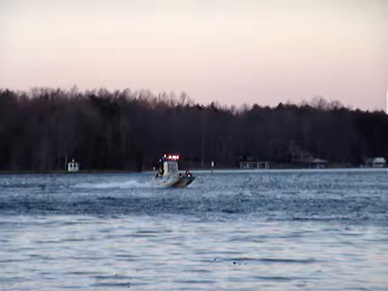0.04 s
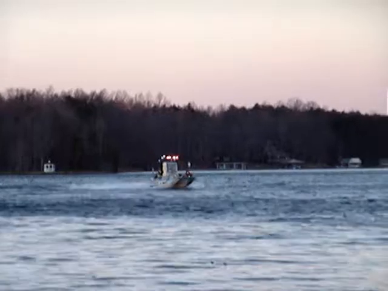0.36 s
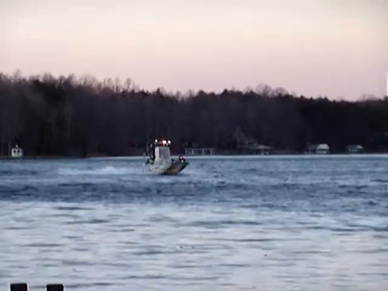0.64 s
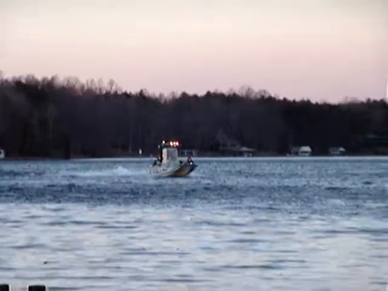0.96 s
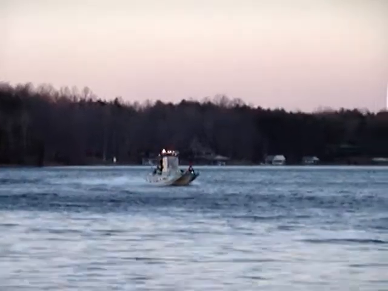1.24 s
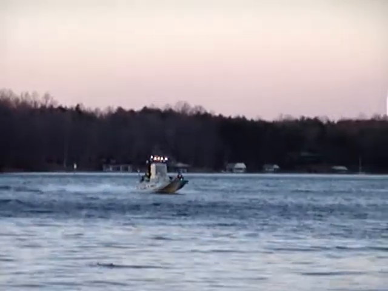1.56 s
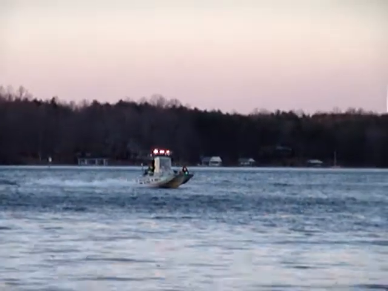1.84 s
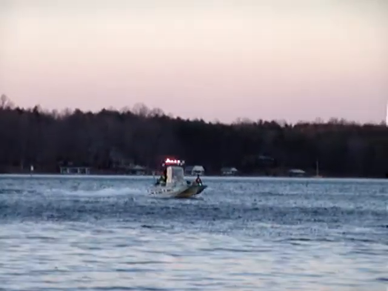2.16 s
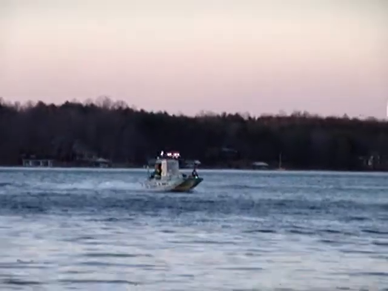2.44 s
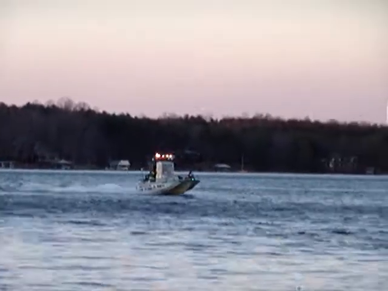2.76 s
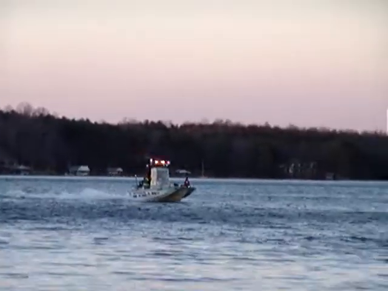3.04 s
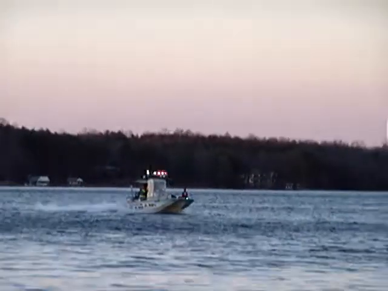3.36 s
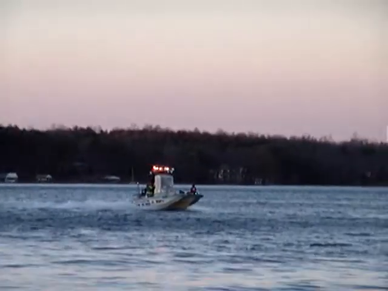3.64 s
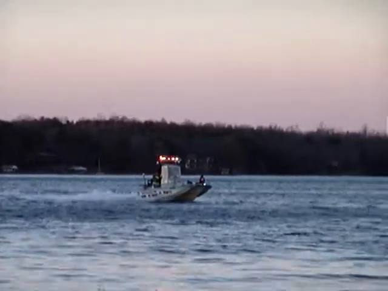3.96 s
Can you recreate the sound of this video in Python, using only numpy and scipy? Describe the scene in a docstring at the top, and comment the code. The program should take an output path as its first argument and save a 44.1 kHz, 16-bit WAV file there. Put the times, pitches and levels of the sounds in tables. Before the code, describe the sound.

A boat engine hums steadily far out on a lake, its whine slowly growing. Gusts rumble on the microphone over a constant wash of water, with small splashes and drips close by at the shore.

```python
"""A distant motorboat drones at a steady speed across a lake, amid wind and choppy water.
The engine repeats its cycle, so its exhaust and whine are harmonics of one rate.
Turbulent gusts buffet the microphone. The water's rush, broadband noise mixed with
ringing air bubbles, swells and sinks over the wash of the open lake.
Close by, wavelets slap the shore and throw drips."""
import sys
import numpy as np
from scipy import signal
from scipy.fft import rfft, irfft
from scipy.io import wavfile
from scipy.ndimage import uniform_filter1d

SR = 44100
rng = np.random.default_rng(int(sys.argv[2]) if len(sys.argv) > 2 else 0)


def master(y):
    """Save y as 16-bit WAV."""
    cut = np.clip(np.atleast_2d(y).T, -1, 1)
    pcm = np.round(cut * 32767)  # scale
    wavfile.write(sys.argv[1], SR, pcm.astype(np.int16))


N = 176400


def amp(db):
    """Amplitude grows tenfold for every 20 dB."""
    return 10 ** (np.asarray(db) / 20)


def unit(x):
    """Normalisation to an rms of 1."""
    return x / np.sqrt(np.mean(x ** 2) + 1e-20)


def level(rows, column=1):
    """A gain envelope, interpolated in decibels from one column of a time table."""
    rows = np.array(rows)
    return amp(np.interp(np.arange(N) / SR, rows[:, 0], rows[:, column]))


def add(mix, start_s, sound):
    """Superposition: a sound adds to the mix from its start time on."""
    part = mix[round(start_s * SR):][:len(sound)]
    part += sound[:len(part)]


def drift(rate_hz):
    """Low-pass filtered noise wanders smoothly, with an rms near 1."""
    hz = np.fft.rfftfreq(2 * N, 1 / SR)
    return unit(irfft(rfft(rng.standard_normal(2 * N)) * np.exp(-(hz / rate_hz) ** 2)))[:N]


def noise(spectrum, patchy_db, patch_hz, patch_s, surges=(), octaves=1):
    """Coloured noise, modulated in random patches of time and frequency and lifted by brief surges."""
    knots_hz, knots_db = np.transpose(spectrum)
    colour = amp(np.interp(np.log(np.fft.rfftfreq(N, 1 / SR) + 1), np.log(knots_hz), knots_db))
    steady = unit(irfft(rfft(rng.standard_normal(N)) * colour, N))
    hz, t, cells = signal.stft(steady, SR, nperseg=512, noverlap=384)
    patches = uniform_filter1d(rng.standard_normal(cells.shape), max(1, round(patch_hz / hz[1])), axis=0)
    gain_db = patchy_db * unit(uniform_filter1d(patches, max(1, round(patch_s / t[1])), axis=1))
    for peak_s, length_s, centre_hz, rise_db in surges:
        off_centre = np.log2((hz[:, None] + 20) / centre_hz) / octaves
        gain_db += rise_db * np.exp(-2 * ((t - peak_s) / length_s) ** 2 - off_centre ** 2)
    return signal.istft(cells * amp(gain_db), nperseg=512, noverlap=384)[1][:N]


def burst(low_hz, high_hz, size):
    """Band-pass filtering confines a short noise to one band."""
    band = signal.butter(3, [low_hz, high_hz], "band", fs=SR, output="sos")
    return unit(signal.sosfilt(band, rng.standard_normal(size)))


def engine(cycle_hz=71.14, wander=0.00094, flutter_rad=0.2):
    """A periodic source radiates harmonics; each fades independently on its way across the water."""
    # Each row: multiple of the cycle rate, relative level in dB.
    exhaust_orders = [(5, -10), (6, 0.5), (9, -13), (10, -15.5), (11, -15.5), (12, -17.5)]
    whine_orders = [(3, 2), (5, 0), (13, -12), (15, -0.5), (16, -7.5), (19, -13.5), (20, -18.5), (21, 0)]
    # Each row: time in seconds, exhaust level in dB, whine level in dB.
    loudness = [(0.1, -33, -48), (0.45, -31.5, -46), (0.6, -34.2, -45), (1.4, -34, -41),
                (1.7, -32.3, -39.5), (2.2, -31, -39), (2.45, -33.3, -40), (2.63, -31.3, -40),
                (2.88, -34, -40), (3.0, -31.2, -39.5), (3.18, -33, -38), (3.26, -39, -36.5),
                (3.5, -37, -37), (4.0, -39, -38)]
    cycles = np.cumsum(cycle_hz * (1 + wander * drift(1.75))) / SR

    def harmonics(orders, fading_db):
        phases = [2 * np.pi * (k * cycles + rng.random()) + flutter_rad * drift(12) for k, _ in orders]
        gains = [amp(db + fading_db * drift(3.2)) for _, db in orders]
        return unit(sum(gain * np.sin(phase) for gain, phase in zip(gains, phases)))
    exhaust = harmonics(exhaust_orders, fading_db=1.8) * level(loudness, column=1)
    whine = harmonics(whine_orders, fading_db=3) * level(loudness, column=2)
    return exhaust + whine


def wind(gain_db=2.5):
    """Turbulent pressure at the microphone makes a low noise with short buffets."""
    # Each row: frequency in Hz, relative spectral density in dB.
    spectrum = [(20, -42), (50, -31.5), (75, -20.5), (105, -17), (140, -8.5), (220, -1.5), (320, 0),
                (450, -4.5), (700, -10), (1200, -16.5), (3000, -59.5)]
    # Each row: time in seconds, relative level in dB.
    breeze = [(0.1, -36), (0.55, -34), (0.85, -35), (1.15, -36), (1.75, -33), (2.05, -33.5), (2.22, -34),
              (2.7, -33.5), (3.1, -36.5), (3.45, -33), (3.6, -36), (4.0, -34)]
    # Each row: peak time in seconds, length in seconds, centre in Hz, rise in dB.
    buffets = [(0.203, 0.034, 360, 12), (0.435, 0.026, 260, 5), (0.99, 0.06, 760, 9), (1.6, .025, 640, 6),
               (1.8, 0.033, 540, 8), (2.09, 0.03, 150, 5), (2.37, 0.08, 180, 8), (2.49, 0.055, 250, 9.5),
               (2.655, 0.035, 300, 6), (2.76, 0.07, 240, 4), (3.28, 0.05, 210, 10), (3.51, 0.05, 240, 5),
               (3.685, 0.045, 190, 9), (3.685, 0.03, 640, 7), (3.9, 0.025, 700, 4)]
    turbulence = noise(spectrum, patchy_db=0.5, patch_hz=350, patch_s=0.014, surges=buffets, octaves=1.3)
    return amp(gain_db) * level(breeze) * turbulence


def bubble(hz, ring_s, fizz, size=1500):
    """An air bubble in water rings as a damped oscillator, here with a little fizz."""
    t = np.arange(size) / SR
    ring = np.sin(2 * np.pi * hz * t) + fizz * burst(hz * 0.5, hz * 1.28, size)
    return ring * np.exp(-t / ring_s) * (1 - np.exp(-5 * t / ring_s))


def fizzing(base_per_s, low_hz, high_hz, spread_db, decay_cycles, pitches=24):
    """Bubbles resonate at pitches set by their sizes, in random crowds as wavelets break."""
    crowding, out = amp(4 * drift(9)), np.zeros(N)
    for hz in np.geomspace(low_hz, high_hz, pitches):
        births = rng.random(N) < crowding * base_per_s / pitches / SR
        strengths = amp(spread_db * np.minimum(rng.exponential(1, N), 3))
        out += signal.oaconvolve(births * strengths, bubble(hz, decay_cycles / hz, fizz=0.31))[:N]
    return unit(out)


def choppy_water():
    """Lapping noise and bubble resonances share one swelling envelope; fine spray lies above."""
    # Each row: frequency in Hz, relative spectral density in dB.
    spectrum = [(200, -22), (500, 3.5), (950, -5), (1400, 4), (1850, 3), (2400, -4.5), (3100, -13),
                (4000, -24.5), (6000, -33.5), (10000, -39.5)]
    # Each row: peak time in seconds, length in seconds, centre in Hz, rise in dB.
    laps = [(0.21, 0.036, 2300, 11), (0.812, 0.012, 3000, 18), (0.95, 0.2, 3250, 4), (1.035, 0.03, 1700, 6),
            (1.53, 0.026, 1770, 10), (1.605, 0.015, 1500, 7), (2.475, 0.026, 1280, 6),
            (2.75, 0.066, 2200, 1.5), (3.037, 0.015, 1530, 11)]
    # Each row: time in seconds, relative level in dB.
    swell = [(0.1, -39), (0.72, -36), (1.0, -31), (1.12, -34), (1.3, -30), (1.47, -32.5), (1.75, -28),
             (2.08, -29.7), (2.28, -33.7), (2.7, -31.5), (3.12, -33.5), (3.35, -29.5), (3.6, -32),
             (4.0, -32)]
    rush = amp(-1) * noise(spectrum, patchy_db=1.32, patch_hz=600, patch_s=0.03, surges=laps, octaves=0.43)
    bubbles = amp(-9) * fizzing(base_per_s=420, low_hz=769, high_hz=2655, spread_db=9, decay_cycles=5)
    spray = amp(-53) * fizzing(base_per_s=220, low_hz=2575, high_hz=8170, spread_db=0, decay_cycles=7)
    return level(swell) * (rush + bubbles) + spray


def lake_wash():
    """The sounds of open water add incoherently to a continuous noise."""
    # Each row: frequency in Hz, relative spectral density in dB.
    spectrum = [(100, -35.5), (300, 5), (550, 3.5), (800, 0), (1300, -5), (3500, -21.5), (4600, -26),
                (6000, -23.5), (7000, -29.5), (8600, -25), (10000, -35)]
    return amp(-36) * noise(spectrum, patchy_db=3.5, patch_hz=958, patch_s=0.027)


def slaps(attack_s=0.0002, decay_s=0.0018, tail_s=0.006, tail_db=-27, size=3000):
    """A brief impact has a broad spectrum: wavelets strike the shore and spatter."""
    # Each row: start in seconds, then the levels of body, splash and spray in dB.
    impacts = [(0.236, -36, -36, -41), (0.686, -40, -38, -42), (0.71, -38, -36, -37),
               (0.808, -32, -35, -34), (0.982, -21, -32, -30), (1.038, -18, -29, -46),
               (1.132, -26, -33, -35), (1.143, -22, -33, -35), (1.159, -31, -31, -36),
               (1.18, -24, -34, -50), (1.191, -14.5, -23, -30), (1.385, -26, -36, -41),
               (1.604, -28, -35, -44), (1.851, -31, -29, -37), (1.972, -29, -34, -38),
               (2.018, -31, -30, -43), (2.587, -27, -32, -33), (2.592, -34, -37, -37),
               (2.681, -28, -33, -41), (2.704, -22, -31, -41), (2.721, -30, -31, -43),
               (2.74, -32, -38, -35), (2.75, -21, -38, -52), (2.844, -36, -38, -36), (2.906, -20, -35, -37),
               (3.209, -30, -31, -37), (3.356, -21, -28, -48), (3.962, -26, -33, -50)]
    # Each row: low and high edge in Hz; the rows are body, splash and spray.
    bands = [(800, 2500), (2500, 5200), (5200, 8700)]
    out, t = np.zeros(N), np.arange(size) / SR
    decay = np.exp(-t / decay_s) + amp(tail_db) * np.exp(-t / tail_s)
    envelope = (1 - np.exp(-t / attack_s)) * decay
    for start_s, *bands_db in impacts:
        splash = sum(amp(db) * burst(low, high, size) for db, (low, high) in zip(bands_db, bands))
        add(out, start_s, envelope * splash)
    return out


def drips():
    """Each falling drop traps an air bubble, which rings at its resonance."""
    # Each row: start in seconds, bubble pitch in Hz, level in dB.
    drops = [(0.236, 4130, -35), (0.25, 7840, -37), (0.36, 5330, -35.5), (0.395, 3570, -34),
             (0.716, 7580, -35), (0.808, 6000, -35), (1.143, 5870, -35), (1.159, 4260, -28),
             (1.171, 8450, -31), (1.18, 7500, -36), (1.4, 7840, -35), (1.444, 5250, -34),
             (1.528, 3000, -25), (1.542, 6460, -37), (1.796, 8750, -31), (1.829, 6100, -39),
             (1.98, 6130, -33), (2.524, 2980, -21.5), (2.553, 5560, -25), (2.578, 5080, -39),
             (2.704, 5510, -36), (2.713, 5660, -36), (2.723, 7320, -31), (2.733, 2920, -23.5),
             (2.75, 1950, -21), (2.784, 4230, -33), (2.83, 2870, -25), (2.842, 8200, -31),
             (2.886, 3400, -29.5), (3.209, 6050, -35), (3.267, 3000, -27.5), (3.532, 7100, -36),
             (3.772, 2620, -26.5), (3.858, 3200, -26.5)]
    out = np.zeros(N)
    for start_s, hz, db in drops:
        add(out, start_s, amp(db) * bubble(hz, ring_s=0.0026, fizz=0.35))
    return out


def scene():
    """The pressures of boat, wind and water add at one microphone."""
    return (engine() + wind() + choppy_water() + lake_wash() + slaps() + drips())[None]


def record(dry, start_s=0.078, cutoff_hz=10050):
    """The sound fades in quickly after a moment of silence; a steep low-pass limits its bandwidth."""
    fade_in = np.clip((np.arange(N) / SR - start_s) / 0.003, 0, 1)
    low_pass = signal.firwin(701, cutoff_hz, window=("kaiser", 9), fs=SR)
    return signal.oaconvolve(dry * fade_in, low_pass[None], "same")


dry = scene()
out = record(dry)
master(out)
```